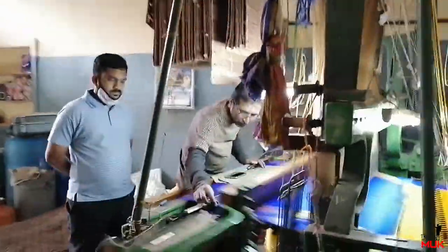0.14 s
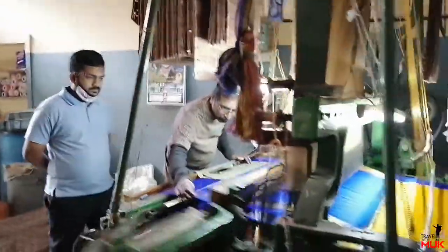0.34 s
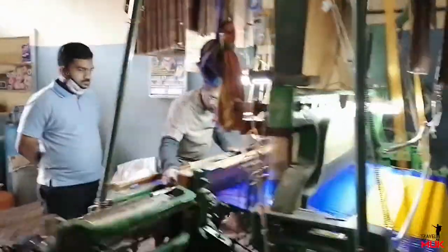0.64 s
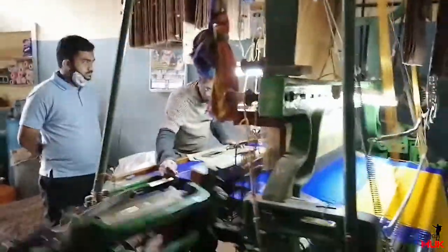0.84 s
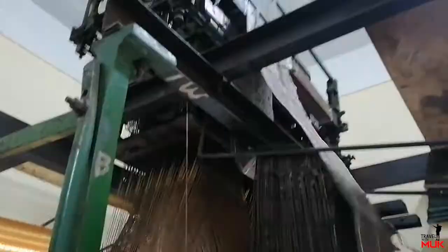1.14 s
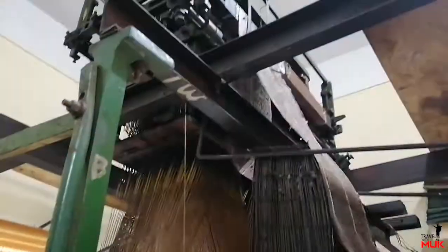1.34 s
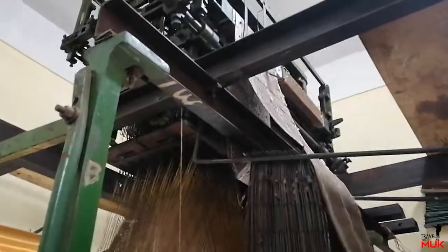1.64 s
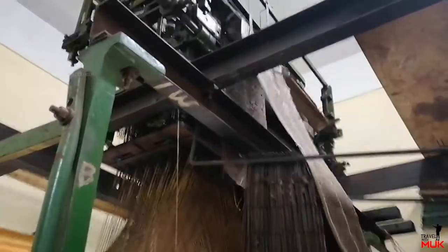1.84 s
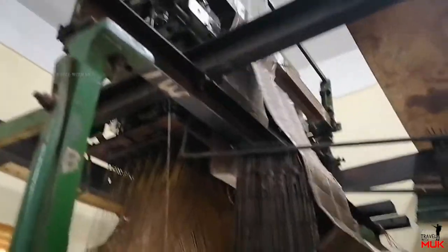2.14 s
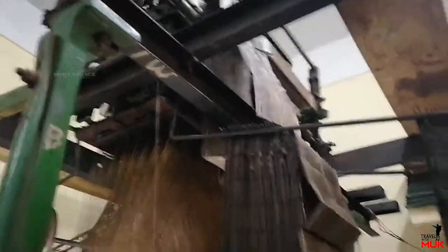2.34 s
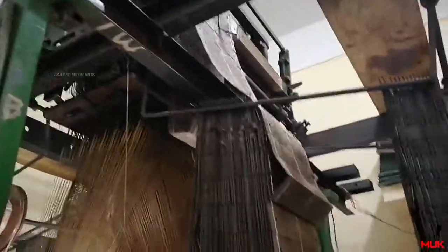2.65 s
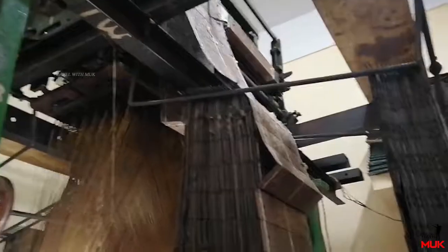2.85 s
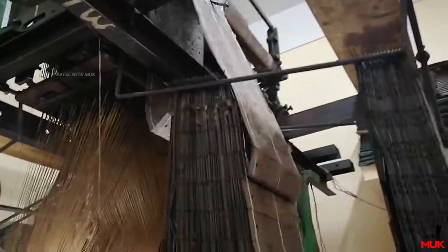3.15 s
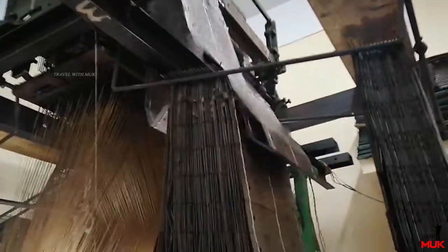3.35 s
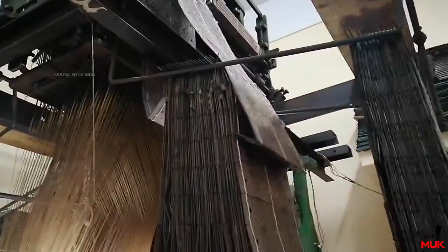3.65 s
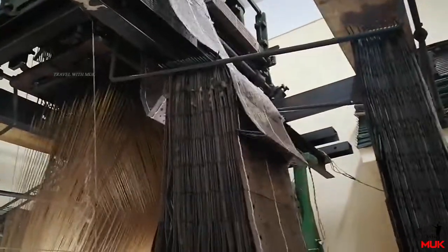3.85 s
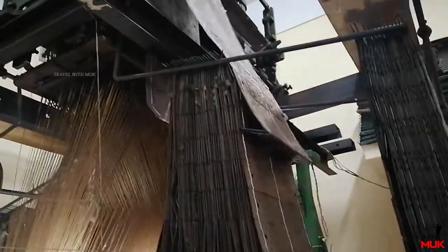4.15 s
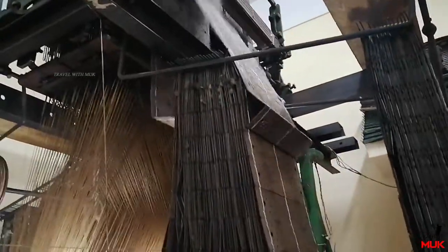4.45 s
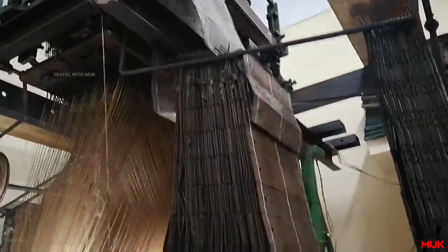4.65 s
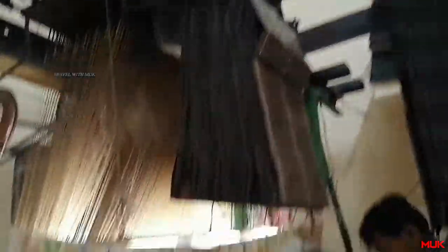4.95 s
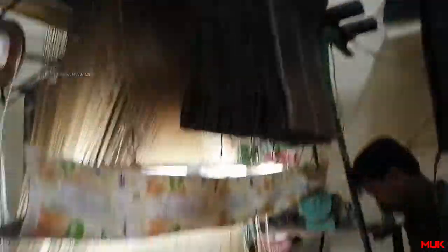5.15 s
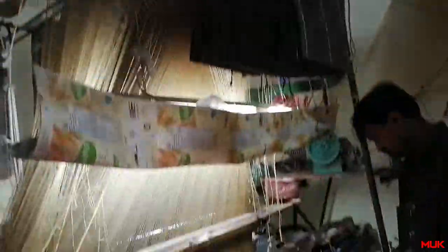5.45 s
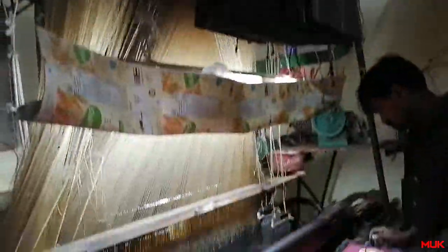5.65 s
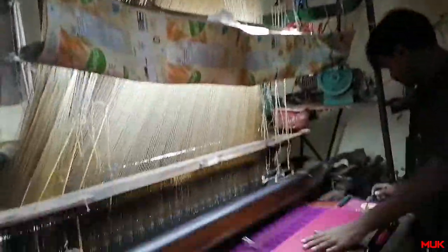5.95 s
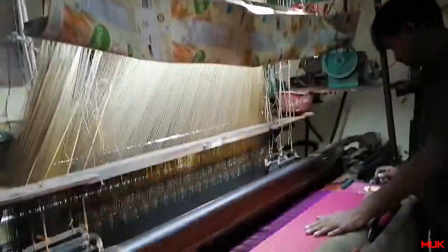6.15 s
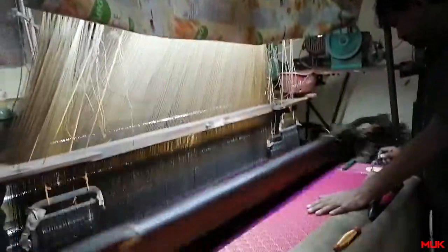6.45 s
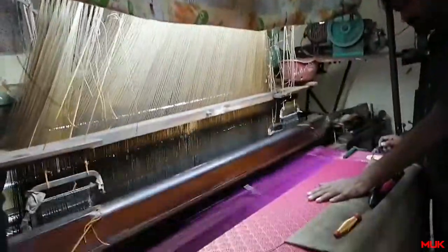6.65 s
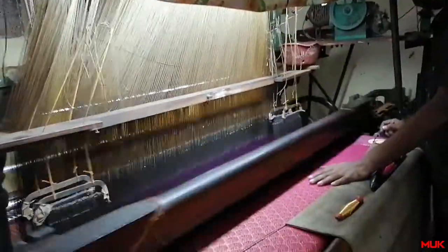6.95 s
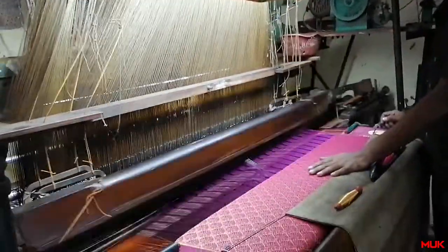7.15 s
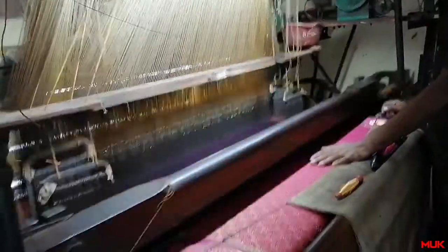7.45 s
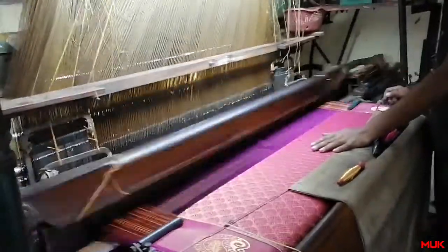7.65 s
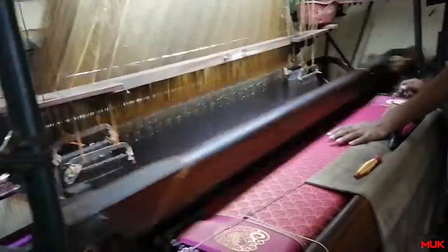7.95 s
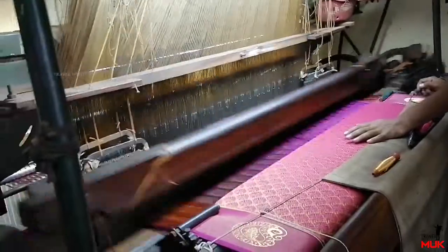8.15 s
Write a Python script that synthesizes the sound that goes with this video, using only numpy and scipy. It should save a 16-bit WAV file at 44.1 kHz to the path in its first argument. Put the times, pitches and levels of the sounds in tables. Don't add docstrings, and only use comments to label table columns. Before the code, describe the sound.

Relentless mechanical weaving racket: banging pickers, cracking shuttles and ticking steel over a dense machine roar, split by one short silent gap.

```python
import sys
import numpy as np
from scipy import signal
from scipy.fft import rfft, irfft, next_fast_len
from scipy.io import wavfile
from scipy.ndimage import uniform_filter1d, map_coordinates

SR = 44100
rng = np.random.default_rng(int(sys.argv[2]) if len(sys.argv) > 2 else 0)


def generate_wav(signal):
    frames = np.transpose(np.atleast_2d(signal))
    scaled = np.clip(frames, -1, 1) * 32767
    pcm = np.round(scaled).astype(np.int16)
    wavfile.write(sys.argv[1], SR, pcm)


def boost(x):
    u = np.asarray(x, float) / 20
    return 10 ** u


N = 366023

# start_s, end_s
PLACES = [
    (0.0, 1.042),
    (1.4055, 8.4),
]


def in_time(rows):
    s, *columns = np.transpose(rows)
    return [np.interp(np.arange(N) / SR, s, c) for c in columns]


def at_hz(points, hz):
    table_hz, values = np.array(points)[:, :2].T
    return np.interp(np.log(hz + 1), np.log(table_hz), values)


def colour(x, spectrum):
    size = 4096
    hz = np.linspace(0, SR / 2, size // 2 + 1)
    log_gain = np.log(boost(at_hz(spectrum, hz)) * np.sqrt(SR / 2))
    fold = np.r_[1, 2 * np.ones(size // 2 - 1), 1, np.zeros(size // 2 - 1)]
    response = irfft(np.exp(rfft(irfft(log_gain) * fold)))
    return signal.fftconvolve(x, response)[:N]


# pitch_hz, likeness (0-1)
LIKENESS = [(30, 0.076), (70, 1), (150, 0.93), (400, 0.88), (800, 0.3), (1200, 0.058), (2000, 0.0)]


def diffuse_pair():
    size = next_fast_len(N)
    alike = np.clip(at_hz(LIKENESS, np.linspace(0, SR / 2, size // 2 + 1)), 0, 1)
    mid, side = rfft(rng.standard_normal((2, size)))
    pair = np.sqrt(1 + alike) * mid + np.sqrt(1 - alike) * side * [[1], [-1]]
    return irfft(pair / np.sqrt(2), size)[:, :N]


def band(x, low_hz, high_hz):
    return signal.sosfilt(signal.butter(2, [low_hz, high_hz], "band", fs=SR, output="sos"), x)


def dying(clicks, t60):
    return signal.lfilter([1], [1, -boost(-60 / (t60 * SR))], clicks + 1e-18)


def sides(db, lean_db):
    return boost([db + lean_db / 2, db - lean_db / 2])


def burst(start_s, t60, rise_s):
    start = round(start_s * SR)
    t = np.arange(min(round(t60 * SR), N - start)) / SR
    return slice(start, start + len(t)), (1 - np.exp(-t / rise_s)) * boost(-60 * t / t60)


PICK_S = [.5715, .644, .625]
# start_s, peak_db, left_minus_right_db, dull_part_db
TICKS = [(1.4422, -1.5, 2, -7.5), (1.477, -5.5, -9, -9.5), (1.6053, -1, -1.5, -6.5),
         (1.7744, -1.5, -5.5, -7), (2.0867, 0.5, -4, -11.5), (2.2497, -2, -8, 0.5), (2.662, -4, -11.5, -6),
         (3.027, 1, 2, -14), (3.4828, -5, -12, -11.5), (3.676, -4, -3, -9), (4.0173, -6.5, 4, -8.5),
         (4.0552, -1, -6.5, -16), (4.184, -6, -2, -3.5), (4.3266, -7, 0, -1), (4.3799, -13, -6.5, 0),
         (4.5013, -8, 5, 3.5), (4.817, -6, -4.5, 1), (4.8928, -3.5, 3.5, -4), (5.0534, -4.5, 2.5, 2),
         (5.7608, 0.5, 3, -6), (6.2572, -4, 6.5, 2), (6.334, -8, -1.5, -2), (6.3505, -2.5, -4, -9),
         (6.5929, -7, 2.5, 0), (6.681, -15, -5.5, 10), (6.761, -4.5, -4, -0.5), (7.1741, -10.5, 5, 2),
         (7.225, -5, 10, -15), (8.058, -0.5, 5, -14), (8.1888, -6, 6, -7.5)]
# start_s, peak_db, left_minus_right_db, dull_part_db
FIRST_TICKS = [
    (0.1116, -8, 4, 0),
    (0.3421, -11.5, 1, 7),
    (0.5531, -3, 2, -22.5),
    (0.621, -23, 0.5, -7.5),
    (0.7806, -24.5, -3.5, -4),
    (0.8016, -16, -1, -5),
    (0.8545, -5.5, 1.5, -8),
    (0.9592, -25.5, -3, 7),
]
# start_s, peak_db, left_minus_right_db, dull_part_db
STRAYS = [(1.5494, -2, 0, -0.5), (1.5794, -4.5, 1, -1), (1.7194, -6, 1, -4), (1.8294, -3, 0.5, -1),
          (1.9094, -4.5, 1, 0), (2.2794, -4, 0.5, 0.5), (2.4794, -1, 1, -2.5), (2.5194, -2.5, 1, -1),
          (2.61, -4, 1, -5), (2.7094, -4, 1, 0.5), (2.9494, -4.5, 0, -3), (2.9794, -5, 1, -1.5),
          (3.3294, -5.5, 0.5, 0.5), (3.6094, -4, 1, -1.5), (3.7494, -7, 2, -0.5), (4.2494, -7.5, 1.5, 0.5),
          (4.4794, -3.5, 1, -1), (4.6594, -5, 1.5, -1.5), (5.0694, -4.5, 1, 0), (5.4094, -4, 0.5, -0.5),
          (5.5994, -4, 1.5, -1), (5.7094, -5, 1, -1), (5.9808, -4, 1, -2), (6.0894, -6, 1, 0),
          (6.2294, -6.5, 1, 1), (6.3094, -7, 0, 0.5), (6.5094, -6.5, 0.5, 1.5), (6.6094, -6, 1, -1.5),
          (7.0294, -7.5, 1, 1.5), (7.1394, -7.5, 1, 0.5), (7.3966, -7, 2.5, -1.5), (7.5093, -4, 1.5, 0),
          (7.7594, -6.5, 1, 2), (7.8421, -3, 1, 0.5), (7.9244, -5, 1.5, -2), (8.0194, -6, 2, -0.5),
          (8.1394, -6.5, 1.5, -3)]
# into_pick_s, peak_db, left_minus_right_db, dull_part_db
PICK_TICKS = [
    [(.055, -15, -1.5, 3.5), (.122, -11.5, -1, -1.5), (.185, -17.5, -3.5, 3.5), (.282, -11, 0.5, -8.5),
     (.375, -10, 0.5, 5.5), (.425, -13.5, -2, 1.5), (.49, -19, 1, 4), (.545, -12, -3.5, 0)],
    [(.152, -14.5, 0, -1), (.22, -22.5, -4, -8.5), (.317, -11, -7.5, 0), (.456, -15.5, 5, 0)],
    [(.035, -16.5, 4.5, -12.5), (.078, -22, 2.5, 5), (.132, -27, -0.5, 5.5), (.235, -16.5, 0.5, 6),
     (.35, -16, -4, 2.5), (.53, -20, 0.5, 0)],
]


def all_ticks():
    hard = np.array([row[0] for row in TICKS])
    rows = FIRST_TICKS + TICKS
    rows = rows + [(s, db - 7.5, lean_db, dull_db) for s, db, lean_db, dull_db in STRAYS]
    takes_over_s = 0.02
    for pick, contacts in zip(PICK_S, PICK_TICKS):
        for into, db, lean_db, dull_db in contacts:
            for s in into + pick * np.arange(16):
                if PLACES[1][0] < s < N / SR and min(abs(hard - s)) > takes_over_s:
                    rows.append((s, db, lean_db, dull_db))
    return rows


def ticks():
    bright, dull = np.zeros((2, 2, N))
    t = np.arange(round(.3 * SR)) / SR
    volley = np.exp(-((t - .006) / np.where(t < .006, .0022, .007)) ** 2)
    smear = boost(-3.0) * (1 - np.exp(-(t / 0.012) ** 2)) * boost(-60 * t / 0.32)
    for s, db, lean_db, dull_db in all_ticks():
        start = round((s - .005) * SR)
        shape = sides(db + 5.5, lean_db)[:, None] * (volley + smear)[:N - start]
        bright[:, start:start + len(t)] += shape
        dull[:, start:start + len(t)] += boost(dull_db + 0.5) * shape
    noise = diffuse_pair()
    return bright * band(noise, 4500, 19000) + dull * band(noise, 900, 4640)


# start_s, peak_db, left_minus_right_db, low_weight_db
FIRST_BLOWS = [
    (0.033, -1, -5, -25),
    (0.3506, -10.5, 2, -17),
    (0.5522, -5.5, -14, -25.5),
    (0.798, -18, -7, -9.5),
    (0.8532, -6, -13, -12.5),
]
# start_s, peak_db, left_minus_right_db, low_weight_db
BLOWS = [(1.4036, -1, -12, -10), (1.517, -5, -1.5, -23), (1.899, 2.5, -9.5, -21.5),
         (2.0042, -3.5, -15, -29), (2.2233, -6, -5.5, -28), (2.557, -2, -8, -22.5), (2.6094, -4, -5.5, -23),
         (2.782, -4, -8, -8), (3.175, -4, -6, -20), (3.2925, -11, -11, -12), (3.4518, -7, -10.5, -28.5),
         (3.8075, 3.5, -7, -18), (3.9747, -5.5, -5, -3), (4.0614, -8, -12, -20), (4.364, -4.5, -8, -22),
         (4.505, -8, -14, -27.5), (4.713, -2.5, -13.5, -25.5), (4.9437, -13.5, -14.5, -26),
         (5.5306, 1.5, -7.5, -17), (5.634, -9, -7.5, -3), (5.706, -10, 0, -34), (5.83, -9, -8, -7),
         (6.569, -3.5, -19.5, -14), (6.6448, -6.5, -12, -20.5), (6.788, -3, -10, -17.5),
         (6.9474, -1, -16, -16), (7.111, -4.5, -18, -22), (7.237, -2, -9, -28.5), (7.537, -3.5, -8, -8),
         (8.058, -6.5, -8, -26)]


def blows():
    contact, body, parts = np.zeros((3, 2, N))
    rows = FIRST_BLOWS + BLOWS
    chance = rng.random((len(rows), 2, 10))
    for (s, db, lean_db, low_db), (pitch, phase) in zip(rows, chance):
        gain = sides(db + 6.5, lean_db + 11.0)[:, None]
        at, shape = burst(s, 0.031, rise_s=0.0014)
        contact[:, at] += gain * shape
        at, shape = burst(s, 0.12, rise_s=0.008)
        body[:, at] += gain * boost(low_db + 14.5) * shape
        at, shape = burst(s, 0.12, rise_s=.003)
        turns = np.outer(np.arange(len(shape)) / SR, 900 * 4.0 ** pitch)
        port_phase = phase * [[[1]], [[3]]]
        ringing = np.sin(2 * np.pi * (turns + port_phase)).sum(axis=2)
        parts[:, at] += gain * boost(-20.5) * shape * ringing
    wash = dying(contact, 0.42) * boost(-50.0) * band(diffuse_pair(), 1100, 4500)
    return wash + body * band(diffuse_pair(), 180, 880) + parts


# start_s, peak_db, left_minus_right_db
LANDINGS = [(.798, -15, -2), (.8525, -6.5, -1), (.872, -9, 1), (1.7744, -6, -3.5), (3.4825, -4.5, -4.5),
            (4.0552, -4, -4.5), (4.327, -6, -4), (4.352, -9, -4), (4.381, -8, 0), (4.502, -7, 0),
            (4.82, -7, -3), (5.056, -6, 2), (6.594, -7, 0), (6.76, -7, -3), (7.8, -7, 0), (3.027, -6, 0),
            (2.088, -6, -3), (4.893, -1.5, -0.5), (4.942, -3, -3.5), (5.7608, -0.5, 0), (6.3505, -5, 0.5),
            (6.785, -6, -3), (7.225, -2, 2.5), (7.3532, -6.5, -4), (8.0586, -2, 2.5)]


def landings():
    crack = np.zeros((2, N))
    for s, db, lean_db in LANDINGS:
        at, shape = burst(s, .06, rise_s=.0012)
        crack[:, at] += sides(db + 7.5, lean_db)[:, None] * shape
    noise = diffuse_pair()
    return crack * (band(noise, 9000, 18000) * boost(3.5) + band(noise, 1800, 9000))


# start_s, pitch_hz, peak_db, t60_s, left_minus_right_db
CLANKS = [(0.03, 1167, -14, 0.28, -5.5), (0.033, 1840, -17, 0.38, -11), (.032, 2570, -21, 0.34, -12),
          (.034, 3470, -26, .3, -10), (.034, 2900, -26.5, .2, -6.5), (.35, 2520, -20, .2, -8),
          (.35, 3240, -21, .15, -8), (.545, 3300, -19.5, .12, -7.5), (.04, 1190, -29, .9, -6),
          (.04, 1833, -30, .9, -7), (.04, 2600, -26, .5, -8), (.035, 1450, -24, .1, -6),
          (0.034, 513, -28, .2, -2.5), (.082, 1800, -21.5, .25, 4.5), (0.117, 1214, -21, 0.64, -3.5),
          (.11, 1720, -25, 0.48, -11.5), (.2, 9900, -25, .2, 8.5), (.33, 1560, -25.5, .15, 3.5),
          (.345, 1894, -21.5, .3, -9), (0.374, 1060, -23.5, .3, 1), (.484, 1420, -21.5, 0.16, 4.5),
          (.553, 2720, -19.5, .2, -5), (0.796, 2650, -17.5, .08, -14), (.853, 2800, -23, .2, 0.5),
          (.862, 2450, -18.5, 0.21, -8)]


def clanks():
    out = np.zeros((2, N))
    chance = rng.random((len(CLANKS), 3, 3))
    for (s, hz, db, t60, lean_db), (spread, left, right) in zip(CLANKS, chance):
        at, shape = burst(s, t60, rise_s=0.0026)
        tones_hz = hz + 50 * (spread + [-1.5, -.5, .5])
        turns = np.outer(np.arange(len(shape)) / SR, tones_hz)
        phase = np.array([left, right])[:, None]
        beats = np.sin(2 * np.pi * (turns + phase)) @ boost(np.array([-5., 0., -4.]))
        out[:, at] += sides(db, lean_db)[:, None] * shape * beats
    return out


# start_s, peak_db, left_minus_right_db
THUMPS = [
    (.553, -22.5, -5),
    (2.11, -29.5, -5.5),
    (7.222, -17.5, 9.5),
]


def thumps():
    out = np.zeros((2, N))
    for s, db, lean_db in THUMPS:
        at, shape = burst(s, 0.11, rise_s=.004)
        swing = np.sin(2 * np.pi * 45 * np.arange(len(shape)) / SR)
        out[:, at] += sides(db, lean_db)[:, None] * shape * swing
    return out


def ring(x, hz, t60):
    r, w = boost(-60 / (t60 * SR)), 2 * np.pi * hz / SR
    return signal.lfilter([0, np.sin(w)], [1, -2 * r * np.cos(w), r * r], x + 1e-18)


def rattle(per_s, cycles):
    sizes = boost(2.56 * np.minimum(rng.exponential(1, (2, N)), 4))
    clicks = sizes * (rng.random((2, N)) < per_s / SR)
    pitches = np.geomspace(700, 15500, 80) * rng.uniform(.99, 1.01, 80)
    dealt = rng.choice(80, (2, N), p=pitches / pitches.sum())
    out = 0
    for k, hz in enumerate(pitches):
        out = out + np.sqrt(hz) * ring(clicks * (dealt == k), hz, cycles / hz)
    return out / np.std(out)


def wander(per_s):
    knots = rng.standard_normal(200)
    return map_coordinates(knots, [np.arange(N) / SR * 2 * per_s], order=3)


# start_s, level_db, brightness_db
NEARNESS = [
    [(0.0, 1, 1), (0.07, 2.5, 1.5), (0.32, 0, -0.5), (0.36, 2, 1.5), (0.55, 1, 1), (0.82, -1.5, 0),
     (0.89, 0, 1.5)],
    [(1.41, -0.5, -1), (2.16, 0.5, 1), (2.39, -0.5, 0), (3.8, 0.5, -1), (4.4, 0.5, 1), (4.92, -0.5, 0.5),
     (5.1, 0, 0), (5.7, 1, -1), (6.3, 0, -1.5), (6.85, -0.5, 0), (7.6, 0, -1), (8.3, 0.5, -1.5)],
]
# floor_db, frames_db, gears_db, wires_db
PART_DB = [
    [2, -3.5, -9, -9.5],
    [2, 2, 1, -0.34],
]
# floor, frames, gears, wires (dB per dB)
PART_BRIGHT = [-0.81, -1.16, 0.74, 0.95]
# into_pick_s, level_db
LOAD = [
    [(0.01, -0.26), (.06, 1), (.1, -0.06), (.19, 0.5), (.24, 0.2), (.32, 0.04), (.4, 1.8), (.46, 0.9),
     (.5, 1.25)],
    [(0.01, 0), (.11, 0.2), (.16, 0.5), (.23, 1.9), (.28, 0.3), (.34, 0.54), (.41, -0.64), (.46, 0.76),
     (.55, 0.3)],
    [(0.01, -0.3), (.08, 1.4), (.14, 1.6), (.2, 1.5), (.28, 0.5), (.35, 0.44), (.43, -0.1), (.49, 0.6),
     (.55, -0.5)],
]
# floor, frames, gears, wires (dB per dB)
LOAD_SHARE = [
    [.4, 0.81, 0.99, 1.35],
    [.2, 0.33, 1.4, 1.7],
    [0.56, 0.86, 1.4, 0.77],
]


def part_levels():
    t = np.arange(N) / SR
    second = t > PLACES[0][1]
    level_db, bright_db = in_time(np.vstack(NEARNESS))
    loads = np.array([np.interp(t, *np.transpose(rows), period=pick) for rows, pick in zip(LOAD, PICK_S)])
    chance = [db * wander(per_s=5.0) for db in [1.6, 0.84, 0.49, 1.1]]
    near = np.transpose(PART_DB)[:, second * 1] + level_db + np.outer(PART_BRIGHT, bright_db)
    return near + second * (np.transpose(LOAD_SHARE) @ loads) + chance


ROAR_EDGES_HZ = [250, 1500, 4000]
# pitch_hz, level_db
FIRST_PLACE = [(40, -2), (110, 1), (230, -5.5), (400, 3.5), (700, 0), (1500, 4), (1900, 5.5), (3000, 0),
               (10000, 0.5), (13000, -3)]


def roar():
    edges = [20, *ROAR_EDGES_HZ, 18000]
    levels = part_levels()
    contacts = boost(1.7 * np.minimum(rng.exponential(1, N), 4)) * (rng.random(N) < 90 / SR)
    flutter = dying(contacts, 0.061)
    clinks = rattle(per_s=1500, cycles=133)
    out = 0
    for k, (depth, clink_db) in enumerate([(0.0, -38.5), (.03, -11.5), (.08, -3), (.15, -5)]):
        swell = boost(levels[k]) * (1 + depth * flutter) / (1 + 4.15 * depth)
        out = out + swell * band(0.89 * diffuse_pair() + boost(clink_db) * clinks, edges[k], edges[k + 1])
    first = np.arange(N) / SR < PLACES[0][1]
    return np.array([np.where(first, colour(x, FIRST_PLACE) / np.sqrt(SR / 2), x) for x in out])


# centre_s, depth_db
LULLS = [(1.47, 0.5), (1.97, 2.5), (2.19, 1), (2.35, 1.5), (2.45, 0), (3.11, 2), (3.26, 1), (3.4, 2.5),
         (3.87, 1), (3.95, 1), (4.04, 1.5), (4.15, 2), (4.44, 1.5), (4.87, 1.5), (5.17, 1), (5.31, 1),
         (5.38, 1), (5.68, 2), (5.8, 2.5), (5.89, 1.5), (6.15, 1.5), (6.43, 2), (6.73, 2), (6.89, -0.5),
         (7.06, 0), (7.46, -1), (7.57, 1), (7.65, 3.5), (7.94, 2.5), (8.23, 0.5)]


def lulls():
    t, db = np.arange(0, N, 32) / SR, 0
    for s, depth_db in LULLS:
        db = db - depth_db * np.exp(-((t - s) / 0.02) ** 2)
    return boost(np.interp(np.arange(N) / SR, t, db))


# start_s, left_minus_right_db
AIM = [(0.0, -7.5), (1.04, -7), (1.41, -7.5), (1.74, -7.5), (2.04, -11), (2.33, -13), (3.08, -13),
       (3.42, -12), (5.17, -10.5), (6.38, -9.7), (8.3, -10)]
# start_s, cupping of the right port (0-1)
GRIP = [(0, 0.01), (2.1, 0.12), (2.4, 0.17), (2.8, 0.4), (3.0, 0.5), (3.2, 0.8), (3.6, 0.9), (5.0, 0.97),
        (8.3, 1.0)]
# pitch_hz, level_db (per Hz)
LEFT_PORT = [(40, -69), (100, -58.5), (250, -61), (1000, -54.5), (1600, -58.5), (2900, -55), (3900, -59.5),
             (5300, -53), (6000, -57), (7600, -56), (8600, -50), (10500, -61.5), (14000, -70.5),
             (15000, -70)]
RIGHT_OPEN = [(60, -58.5), (250, -58.5), (1200, -50.5), (1600, -52.5), (2900, -41), (3400, -44.5),
              (4150, -53), (5200, -43.5), (6400, -41), (7100, -38), (8000, -55), (10000, -57),
              (14000, -61.5), (14800, -55)]
RIGHT_CUPPED = [(60, -61), (250, -59), (1200, -50), (1600, -51), (2750, -43), (3300, -49), (3900, -59),
                (4850, -43), (5300, -37.5), (6100, -48), (7500, -57), (10000, -57), (14000, -62.5),
                (15000, -62.5)]


def ports(air):
    aim_db, = in_time(AIM)
    cupped = np.clip(in_time(GRIP)[0], 0, 1)
    left = boost(aim_db + 10) * colour(air[0], LEFT_PORT)
    right = 0
    for stage in np.linspace(0, 1, 5):
        shape = (1 - stage) * np.array(RIGHT_OPEN) + stage * np.array(RIGHT_CUPPED)
        right = right + np.clip(1 - 4 * abs(cupped - stage), 0, 1) * colour(air[1], shape)
    return np.array([left, right])


def scene():
    looms = lulls() * (roar() + ticks()) + blows() + landings()
    return ports(looms) + clanks() + thumps()


# pitch_hz, step_db
STEPS = [
    [(300, -20), (1500, -13), (3000, -7), (4000, -1), (6000, -4), (8500, -3), (11000, 2), (14000, 3)],
    [(300, -20), (1500, -15), (3000, -10), (4000, -6), (6000, -7), (7500, -2), (11000, -1), (14000, 0)],
]


def camera_rounding(x):
    hop, lead = 1024, 1024 - 146
    n, k = np.arange(2 * hop) + .5, np.arange(hop) + .5
    window = np.sin(np.pi * n / 2 / hop)[:, None]
    basis = window * np.cos(np.pi / hop * np.outer(n + hop / 2, k)) * np.sqrt(2 / hop)
    halves = np.pad(x, [(0, 0), (lead, 3 * hop - (x.shape[1] + lead) % hop)]).reshape(2, -1, hop)
    lines = np.concatenate([halves[:, :-1], halves[:, 1:]], axis=2) @ basis
    around = uniform_filter1d(uniform_filter1d(lines ** 2, size=120, axis=2), size=3, axis=1)
    own, shared = np.split(rng.standard_normal((3, lines.shape[1], hop // 8)), [2])
    luck = np.repeat(uniform_filter1d(own + shared, size=2, axis=1), 8, axis=2)
    step_db = np.array([at_hz(side, k * SR / 2 / hop) for side in STEPS])[:, None] + 4.5 * luck
    step = boost(step_db) * np.sqrt(abs(around) + 1e-16)
    rounded = np.sign(lines) * step * np.floor(abs(lines / step) + .42)
    frames = rounded @ basis.T
    return (frames[:, 1:, :hop] + frames[:, :-1, hop:]).reshape(2, -1)[:, lead:lead + N]


def band_limit(x):
    return signal.sosfilt(signal.butter(12, 15610, fs=SR, output="sos"), x)


CUTOFF_HZ = [15420, 15800]


def record(dry):
    filters = [signal.cheby2(20, 50, hz, fs=SR, output="sos") for hz in CUTOFF_HZ]
    top = np.array([signal.sosfilt(sos, x) for sos, x in zip(filters, dry)])
    t = np.arange(N) / SR
    running = sum((t >= a) & (t < b) for a, b in PLACES)
    kept = camera_rounding(np.pad(top, [(0, 0), (1024, 0)], "reflect"))
    mix = np.clip(kept * running, -1, 1)
    return band_limit(mix)


dry = scene()
out = record(dry)
generate_wav(out)
```